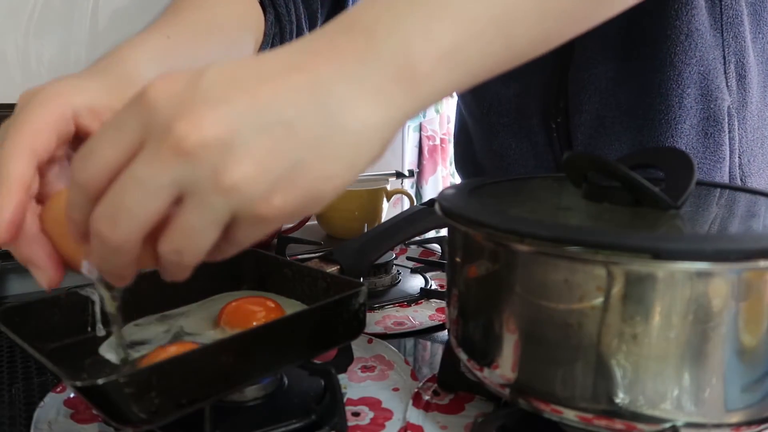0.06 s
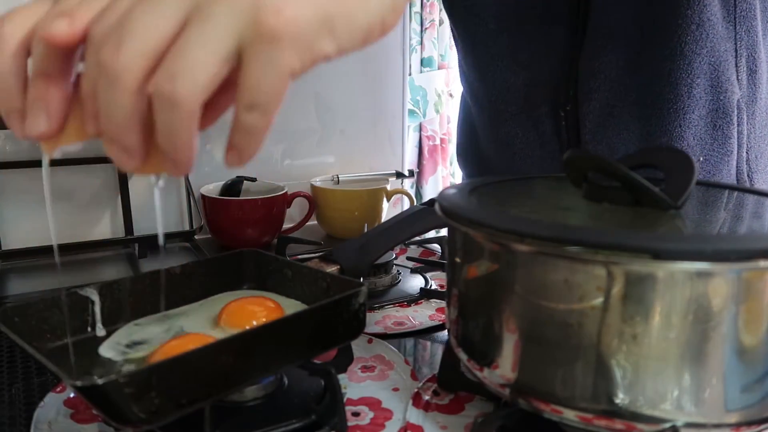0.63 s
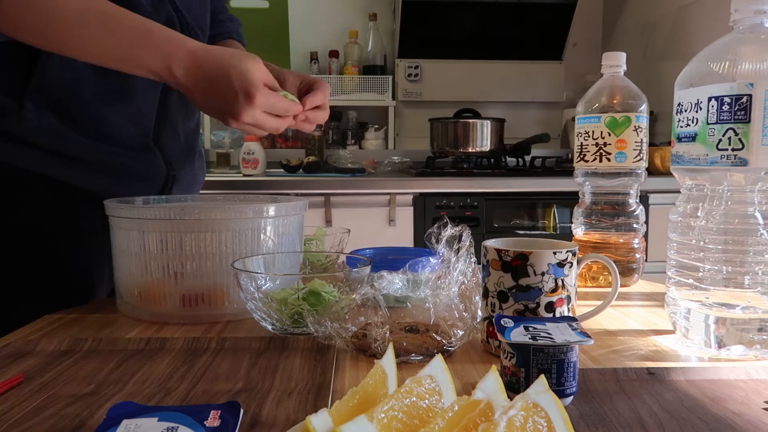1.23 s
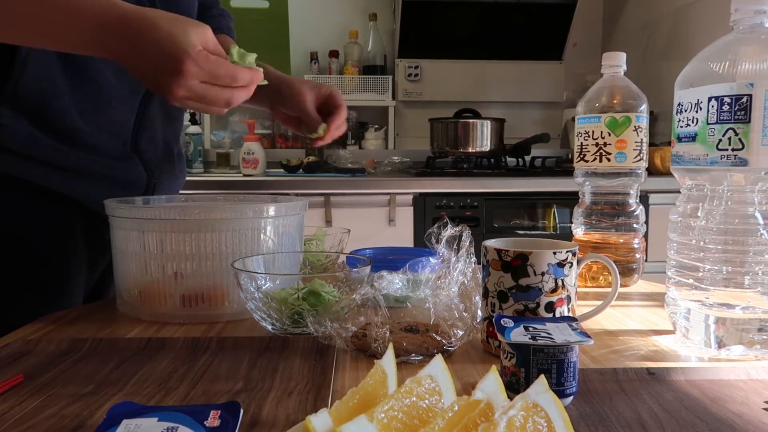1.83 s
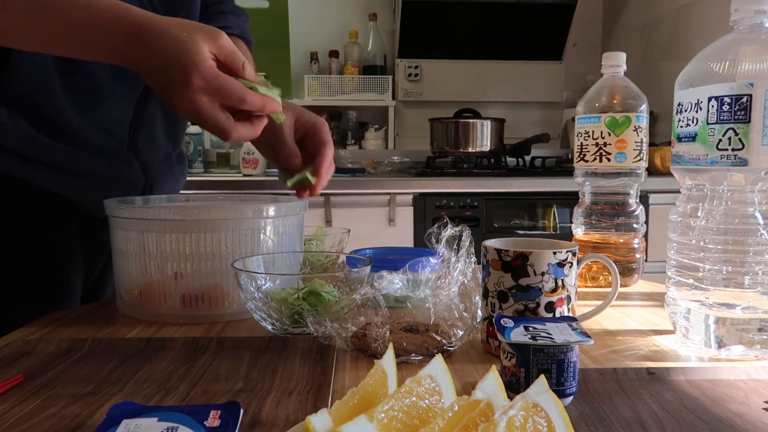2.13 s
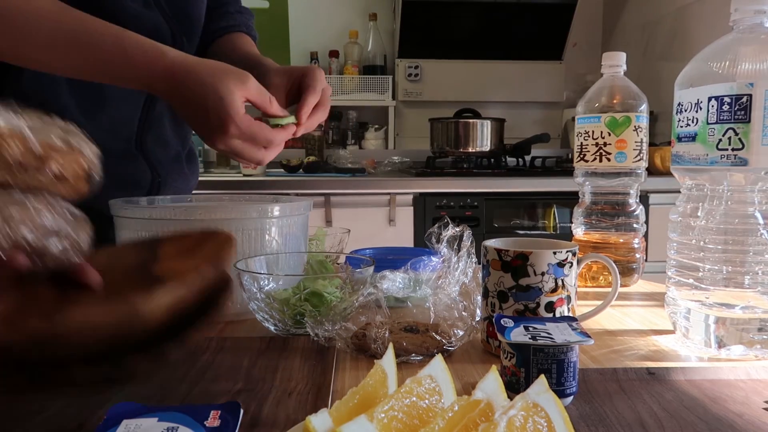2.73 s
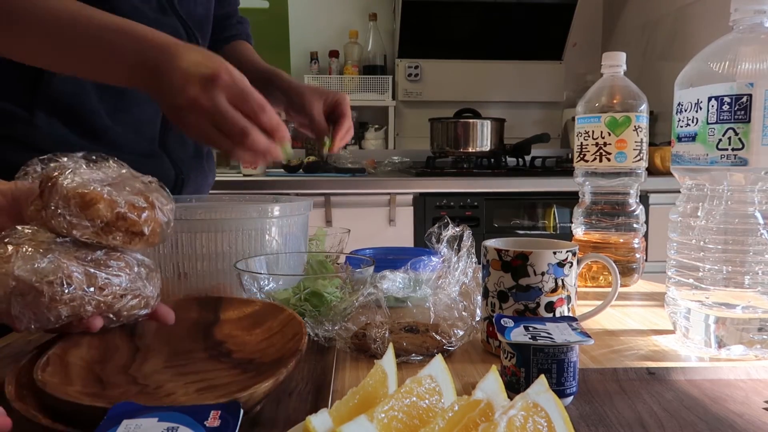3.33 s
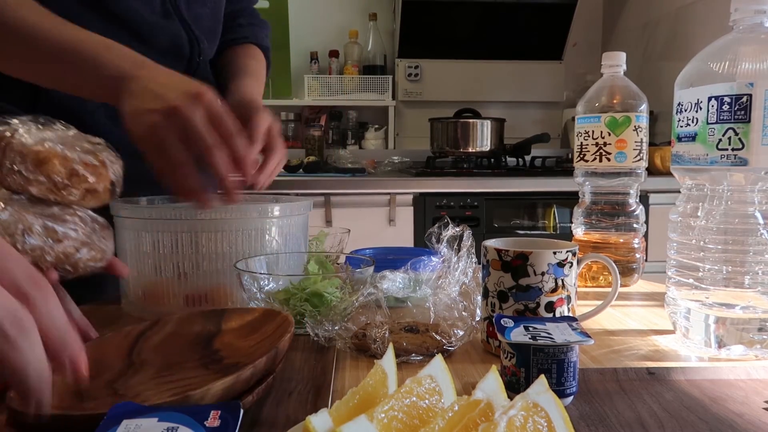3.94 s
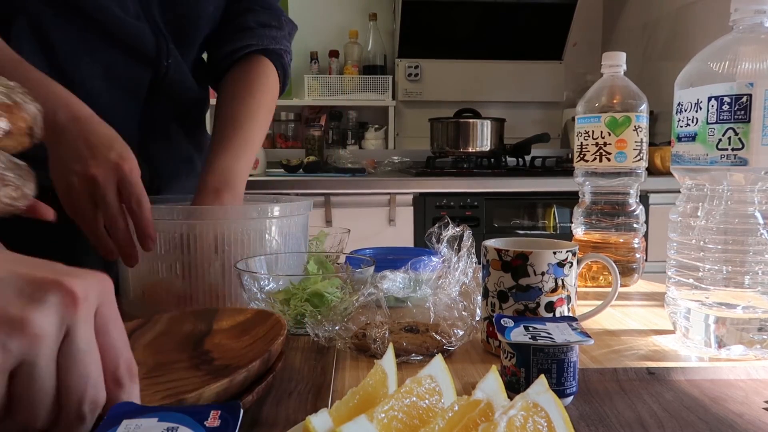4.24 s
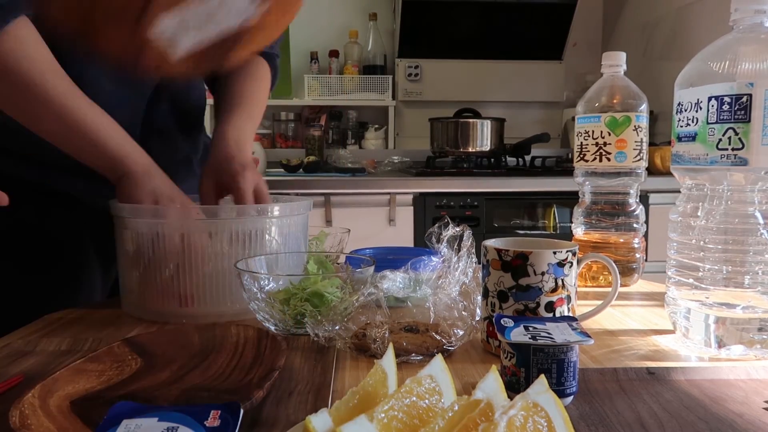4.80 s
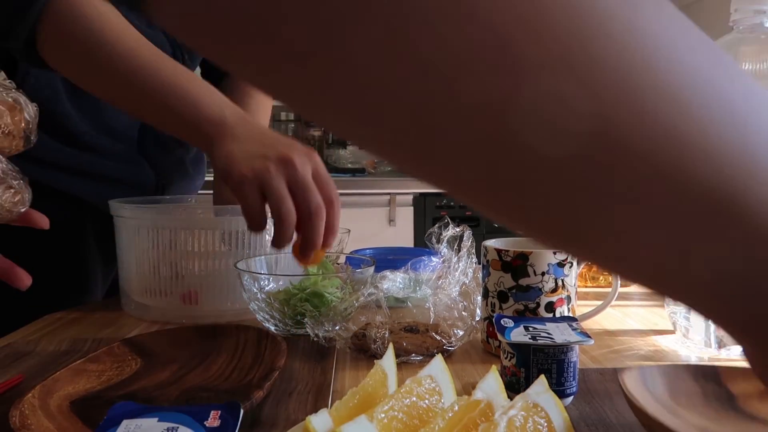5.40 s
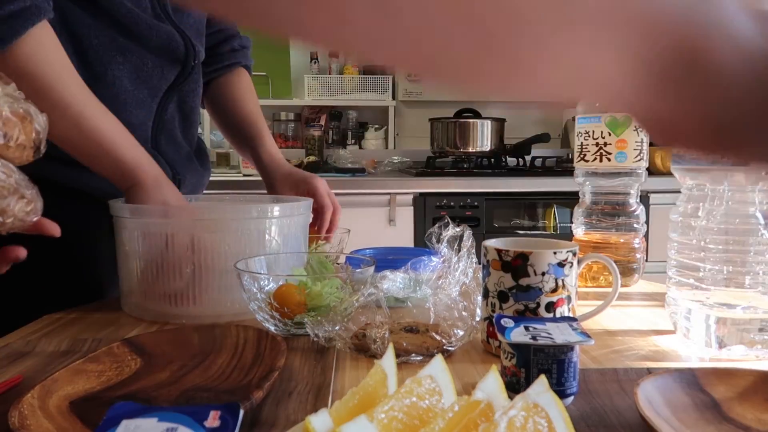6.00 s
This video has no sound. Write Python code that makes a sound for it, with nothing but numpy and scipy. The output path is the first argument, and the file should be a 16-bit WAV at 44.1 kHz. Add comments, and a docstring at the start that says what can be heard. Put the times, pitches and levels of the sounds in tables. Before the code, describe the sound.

A home kitchen extractor hood hums with rushing air and low fan tones. An eggshell cracks at about 0.1 seconds and crunches again around 0.6, with a faint sizzle of egg from 0.2. Just before 0.9 seconds, hum and sizzle cut off, leaving quiet room tone. From then on, hands tear lettuce a little way back, making irregular crisp snaps, light crackling and dull sleeve rustle. After soft table bumps around 2.5 seconds and a brief rub, wooden plates clack together very loudly at 3 seconds, close on the left, slightly overloading the microphone and briefly lowering the background. Lighter taps follow, with wood sliding and scraping from 3.9 to 4.7 seconds as the leaves keep crackling. At 5.6 and 5.9 seconds, a wooden dish lands on the table on the right with two hard knocks and a short room echo.

```python
"""An extractor hood hums in a home kitchen, rushing air under fan tones, while eggshell cracks and egg
sizzles in a pan, until hum and sizzle stop short. Then lettuce is rummaged and torn, its cells bursting,
while wooden plates are stacked and slid and a dish is set down close to the microphone. Impact and
friction excite the modes of the wood and the table, and the room answers with a short echo.
The hardest knocks overload the microphone, and its gain control ducks the room."""
import sys
import numpy as np
from scipy import signal
from scipy.fft import rfft, irfft, next_fast_len
from scipy.io import wavfile
from scipy.ndimage import uniform_filter1d

SR = 44100
rng = np.random.default_rng(int(sys.argv[2]) if len(sys.argv) > 2 else 0)


def pcm_store(signal):
    """Save signal as 16-bit PCM."""
    levels = np.round(np.clip(np.atleast_2d(signal), -1, 1) * 32767)
    wavfile.write(sys.argv[1], SR, levels.astype(np.int16).T)


N = 267246
TIME = np.arange(N) / SR
RING = np.arange(SR // 3) / SR  # time axis of one short event, in seconds
HOOD_STOP_S = .872

# Spectrum of a crisp fracture in leaf or shell. Each row: frequency in Hz, relative level in dB.
FRACTURE_SPECTRUM = [(200, 3.5), (900, -6), (1700, 0.5), (2800, 5), (3600, 0), (5500, -6), (8000, -9.5),
                     (12000, -24), (15500, -40)]
# Modes of the plates and of the table top. Each row: frequency in Hz, level in dB, T60 in seconds.
PLATE_MODES = [(674, -2.5, 0.082), (822, 1.5, 0.089), (912, -4.5, 0.15), (1008, -4, 0.1), (1124, -2, 0.086),
               (1331, 0.5, 0.066), (1390, -3.5, 0.076), (1690, 2, 0.033), (1795, -2.5, 0.046),
               (1900, 1.5, 0.055), (2157, 0.5, 0.026), (2205, 5, 0.049), (2574, 1, 0.045),
               (2800, -3.5, 0.023), (3330, -6, 0.039)]
TABLE_MODES = [(109.5, -4.5, .046), (150, -6.5, .09), (196, 0, 0.14), (266.4, 1.5, 0.17), (318, 13, 0.027),
               (341, 5.5, 0.056), (410, 2.5, 0.072), (486, 0, .024), (547, -1, 0.068), (680, -4.5, 0.047)]


def amp(db):
    """Decibels as an amplitude ratio."""
    return 10 ** (np.asarray(db) / 20)


def read(points, hz):
    """Interpolation of (Hz, value) points on a log-frequency axis."""
    f, value = np.transpose(points)
    return np.interp(np.log(hz + 1), np.log(f + 1), value)


def evened(x):
    """Normalisation to rms 1."""
    return x / np.sqrt(np.mean(x ** 2) + 1e-20)


def unit_blow(x):
    """Normalisation to the energy of 10 ms at rms 1."""
    return x / np.sqrt(np.sum(x ** 2) * 100 / SR + 1e-20)


def add(mix, s, sound):
    """Superposition of a sound on the mix, from s seconds on."""
    part = mix[round(s * SR):][:len(sound)]
    part += sound[:len(part)]


def coloured(x, points, tilt_db=0):
    """Minimum-phase filtering by a spectrum, tilted by tilt_db per octave above 1 kHz."""
    size = 2 * next_fast_len(x.shape[-1] // 2 + 1024)
    hz = np.fft.rfftfreq(size, 1 / SR)
    gain = amp(read(points, hz) + tilt_db * np.log2(np.maximum(hz, 1000) / 1000))
    cepstrum = irfft(np.log(gain))
    cepstrum[1:size // 2] *= 2  # folding the cepstrum makes the filter causal
    cepstrum[size // 2 + 1:] = 0
    return irfft(rfft(x, size) * np.exp(rfft(cepstrum)), size)[..., :x.shape[-1]]


def grains(count, per_s, spread_db):
    """Shot noise: random impulses of very uneven size."""
    size = amp(spread_db * np.minimum(rng.exponential(1, count), 4))
    return size * rng.choice([-1, 1], count) * (rng.random(count) < per_s / SR)


def wander(samples):
    """Slow fluctuation of rms 1: a moving average of white noise."""
    return evened(uniform_filter1d(rng.standard_normal(N), samples))


def burst(length_s):
    """A broadband transient: decaying noise with its spectrum flattened."""
    spectrum = rfft(rng.standard_normal(len(RING)) * np.exp(-RING / length_s))
    return irfft(spectrum / (abs(spectrum) + 1e-12), len(RING)) * np.exp(-RING / (10 * length_s))


def progress(s, length_s):
    """A linear ramp from 0 to 1 over a movement."""
    return np.clip((TIME - s) / length_s, 0, 1)


def ring(modes, scatter_db, favoured_hz=None, favour_db=7.5, favour_octaves=.18):
    """Free vibration in damped modes; the point of contact favours those near one frequency."""
    hz, db, t60 = np.transpose(modes)[:, :, None]
    if favoured_hz:
        db = db + favour_db * np.exp(-(np.log2(hz / favoured_hz) / favour_octaves) ** 2)
    polarity = (-1) ** np.arange(len(hz))[:, None]
    share = polarity * amp(db + scatter_db * rng.standard_normal(hz.shape))
    decay = np.exp(-np.log(1000) * RING / t60)
    return unit_blow((share * decay * np.sin(2 * np.pi * hz * RING)).sum(0))


def diffuse(pair):
    """A diffuse field: coherent at the two ports in the bass, wide in the treble."""
    # Each row: frequency in Hz, gain of side relative to mid in dB.
    side_gain = [(30, -35.5), (100, -29.5), (400, -9), (1200, -9.5), (2500, -12), (4500, -3), (8000, 1.5),
                 (15000, 13.5)]
    side = coloured(pair[1], side_gain)
    return np.array([pair[0] + side, pair[0] - side])


def placed(x, bearing, wet_db):
    """Direct sound leads in phase at the nearer port (positive bearing: left); reverberation follows."""
    # Each row: frequency in Hz, phase between the ports in radians at bearing 1.
    port_phase = [(100, 0.0984), (3000, 0.23), (5500, 2.16), (9000, 2.45), (15000, 4)]
    # Each row: frequency in Hz, reverberation time in seconds.
    kitchen_t60 = [(100, 0.43), (400, 0.26), (2000, 0.25), (6000, 0.21), (14000, 0.16)]
    size = next_fast_len(N + SR // 2)
    turn = np.exp(.5j * bearing * read(port_phase, np.fft.rfftfreq(size, 1 / SR)))
    reflections = grains(2 * len(RING), per_s=5000, spread_db=-2.5).reshape(2, -1)
    hz, t, bands = signal.stft(reflections, SR, nperseg=256)
    decay = np.exp(-np.log(1000) * t / read(kitchen_t60, hz)[:, None])
    tail = signal.istft(bands * decay, SR, nperseg=256)[1][:, :len(RING)]
    tail *= np.clip(RING / 0.00054 - 1, 0, 1)  # silent until the nearest surfaces answer
    echo = amp(wet_db) * diffuse(tail / np.linalg.norm(tail[0]))
    return irfft(rfft(x, size) * (np.array([turn, 1 / turn]) + rfft(echo, size)), size)[:, :N]


def hood(air_db=-33.5, waver_radians=0.53, width_db=-6):
    """Broadband flow noise and fan tones of wavering phase, stopping at once."""
    # Each row: frequency in Hz, relative level in dB.
    air_spectrum = [(18, -43), (30, -11), (81, -10.5), (158, -3), (304, -10), (364, -9.5), (460, -13),
                    (497, -10.5), (552, -16), (905, -16), (1090, -23), (2630, -28), (2840, -29),
                    (5440, -47), (9000, -52.5), (11000, -69), (15000, -78)]
    # Each row: frequency in Hz, rms level in dB.
    fan_tones = [(166.9, -37.5), (199.2, -63), (371.4, -44.5), (500.6, -42.5)]
    air = amp(air_db) * evened(coloured(rng.standard_normal((2, N)), air_spectrum))
    for hz, db in fan_tones:
        drift = evened(uniform_filter1d(wander(5000), 3000))
        air[0] += amp(db) * np.sqrt(2) * np.sin(2 * np.pi * hz * TIME + waver_radians * drift)
    running = np.clip((HOOD_STOP_S - TIME) / 0.00038, 0, 1)
    return diffuse(air * amp([[0], [width_db]])) * running


def fractures(decay_s, per_s, spread_db):
    """A cascade of tiny fractures: impulses that swell, then die away exponentially."""
    return grains(len(RING), per_s, spread_db) * np.sqrt(RING) * np.exp(-RING / decay_s)


def eggshell(ring_t60=0.042, edge_db=-36):
    """Brittle fracture: each crunch excites a resonance of the shell; the first has a bright edge."""
    # Each row: start in seconds, level in dB, decay time in seconds, ring over crunch in dB, ring in Hz.
    breaks = [(0.0746, -28, 0.0073, -8, 1930), (0.102, -37.5, 0.0017, 15, 2010),
              (0.586, -31, 0.004, -13, 2300), (0.597, -28.5, .004, 15, 2990),
              (0.604, -31.5, 0.0052, 5, 2290), (.621, -34, .003, 15, 3160),
              (.671, -32.5, 0.0061, -10, 2930)]
    # Each row: frequency in Hz, relative level in dB.
    crunch_spectrum = [(800, -16), (1600, -7), (2100, -0.5), (3300, 0), (4200, -19), (7000, -30),
                       (14000, -44)]
    out = np.zeros(N)
    for s, db, decay_s, ring_db, hz in breaks:
        clicks = coloured(grains(len(RING), per_s=4000, spread_db=7.5), crunch_spectrum)
        crunch = unit_blow(clicks * np.sqrt(RING) * np.exp(-RING / decay_s))
        shell = ring([(hz, 0, ring_t60)], scatter_db=0)
        add(out, s, amp(db) * unit_blow(crunch + amp(ring_db) * shell))
    edge = unit_blow(coloured(burst(0.0022), FRACTURE_SPECTRUM, tilt_db=6))
    add(out, breaks[0][0], amp(edge_db) * edge)
    return placed(out, bearing=0.97, wet_db=-15)


def sizzle(start_s=0.21, rise_s=0.024, level_db=-51, fade_db_per_s=16):
    """Shot noise of bursting bubbles: egg white meets the warm pan, calms, and ends with the hum."""
    # Each row: frequency in Hz, relative level in dB.
    fizz_spectrum = [(1500, -12), (4000, -9), (7000, -7), (8700, -13), (10500, -24), (14000, -28)]
    fizz = evened(coloured(grains(N, per_s=7300, spread_db=3.5), fizz_spectrum))
    envelope = progress(start_s, rise_s) * amp(level_db - fade_db_per_s * (TIME - start_s))
    return placed(envelope * fizz * (TIME < HOOD_STOP_S), bearing=0.97, wet_db=-12)


def handling(fade_s=0.11):
    """Amplitude envelope of the hands' work, rising as they move and falling as they rest."""
    # Each row: start in seconds, start of the fade-out in seconds, level in dB.
    spells = [(0.817, 1.254, -51), (1.244, 1.635, -50), (1.64, 2.951, -49.5), (3.094, 3.855, -75.5),
              (4.23, 5.523, -51), (5.59, 6.1, -46.5)]
    return sum(amp(db) * progress(start, fade_s) * (1 - progress(end, fade_s))
               for start, end, db in spells)


def brushing(over_rustle_db=2.5, uneven_db=2):
    """Dull, uneven friction noise of sleeves and soft leaves during the handling."""
    # Each row: frequency in Hz, relative level in dB.
    brush_spectrum = [(25, -14), (60, -1), (160, 1.5), (300, 0.5), (500, -7.5), (1200, -14), (2600, -14),
                      (6000, -53), (15000, -55.5)]
    uneven = amp(uneven_db * wander(2500))
    friction = evened(uneven * coloured(rng.standard_normal((2, N)), brush_spectrum))
    return diffuse(amp(over_rustle_db) * handling() * friction)


def snap(decay_s, tilt_db, hz, t60_cycles=13, ring_loss_db_per_s=300):
    """Bursting cells drive a damped leaf resonance; a slow tear rings less than a clean snap."""
    cells = fractures(decay_s, per_s=1500, spread_db=1.5)
    leaf = signal.oaconvolve(cells, ring([(hz, 0, t60_cycles / hz)], scatter_db=0))[:len(RING)]
    crack = unit_blow(coloured(cells, FRACTURE_SPECTRUM, tilt_db))
    return unit_blow(crack + amp(-0.5 - ring_loss_db_per_s * decay_s) * unit_blow(leaf))


def lettuce(clump_db=5):
    """Cell rupture: torn leaves snap, and handled leaves crackle in small clumps."""
    # Each row: start in seconds, level in dB, decay time in seconds, tilt in dB per octave, ring in Hz.
    tears = [(0.923, -42.5, 0.0025, 5.5, 3200), (0.961, -41, 0.004, 0, 2900),
             (1.097, -28, 0.0042, 2.5, 3000), (1.103, -30.5, 0.0059, 7, 4150),
             (1.304, -41, 0.0022, 11.5, 3500), (1.376, -40, 0.028, 3.5, 3950), (1.421, -39, 0.022, 4, 3250),
             (1.517, -36.5, 0.025, 5.5, 4740), (1.592, -38, 0.0049, -1.5, 2150),
             (1.604, -34, 0.0033, 2, 5430), (1.726, -31, 0.0084, 4, 2450), (1.814, -33, 0.0068, -5.5, 2030),
             (2.288, -34.5, 0.0016, 5.5, 3150), (2.436, -26.5, 0.0056, -1, 3600),
             (2.449, -27, 0.01, 2.5, 2530), (2.695, -36, 0.014, 0, 5400), (2.789, -41, 0.0055, 5, 2880),
             (2.82, -41, 0.0016, 7, 3200), (2.881, -41, 0.0015, 3, 3310), (3.155, -27, 0.014, -1.5, 5400),
             (3.226, -44, 0.00093, 22, 7660), (3.353, -42, 0.0023, -5.5, 4130),
             (3.604, -35, 0.0034, 3.5, 7700), (3.767, -42, .003, 3.5, 2460), (4.308, -42, .003, -8, 2720),
             (4.426, -45, 0.0013, 4, 3480), (4.486, -42, 0.006, -6, 2110), (4.568, -38, 0.014, 1, 2680),
             (4.67, -46, 0.0029, 4, 3000), (4.752, -39.5, 0.0033, 3.5, 2980),
             (4.794, -38.5, 0.0034, 0, 2530), (4.853, -43, 0.00087, 5.5, 2900),
             (5.008, -45, 0.0055, 6, 3700), (5.074, -41, 0.0049, -3, 2240),
             (5.096, -37.5, 0.0056, 1.5, 2650), (5.171, -34, 0.003, 21, 2970),
             (5.303, -45, 0.0027, -1, 3330), (5.412, -42.5, 0.0045, 8, 3060), (5.719, -37, 0.0061, 2, 3000),
             (5.84, -46, .002, 6, 6030)]
    snaps = np.zeros(N)
    for s, db, decay_s, tilt_db, hz in tears:
        add(snaps, s, amp(db) * snap(decay_s, tilt_db, hz))
    cells = amp(clump_db * wander(600)) * grains(N, per_s=1800, spread_db=3)
    rustle = handling() * evened(coloured(cells, FRACTURE_SPECTRUM, tilt_db=0.75))
    return placed(snaps, bearing=-0.42, wet_db=-6) + placed(rustle, bearing=-0.56, wet_db=-7)


def contacts(rows, graze_lead_s=0.0062, graze_db=-26):
    """Multiple impact: wood grazes, lands, then tips onto its other edge, duller and with more thump."""
    for s, db, cutoff_hz, thump_db, settle_s, settle_db, favoured_hz in rows:
        yield s - graze_lead_s, db + graze_db, cutoff_hz / 2, thump_db, None
        yield s, db, cutoff_hz, thump_db, favoured_hz
        yield s + settle_s, db + settle_db, cutoff_hz * 0.51, thump_db + 1.5, favoured_hz


def push(hz, length_s):
    """A dull pulse of band-limited noise, peaking at half of length_s."""
    swell = RING / length_s * np.exp(2 - 2 * RING / length_s) * signal.windows.tukey(len(RING), .02)
    band = signal.butter(2, [hz / 2, 1.5 * hz], "band", fs=SR, output="sos")
    return evened(signal.sosfilt(band, rng.standard_normal(len(RING)))) * swell


def knocks(rows, modes, crack_spectrum, crack_db, crack_s, push_db, push_hz, push_s):
    """Impact excites a crack and the wood's modes, low-passed by a soft contact; the table thumps."""
    out = np.zeros(N)
    for s, db, cutoff_hz, thump_db, favoured_hz in contacts(rows):
        contact_s = crack_s * amp(-0.12 * db)  # a light touch chatters for longer than a firm blow
        crack = unit_blow(coloured(burst(contact_s), crack_spectrum))
        wood = ring(modes, scatter_db=4.5, favoured_hz=favoured_hz) + amp(crack_db) * crack
        wood = unit_blow(signal.lfilter(*signal.butter(4, cutoff_hz, fs=SR), wood))
        add(out, s, amp(db) * (wood + amp(thump_db) * ring(TABLE_MODES, scatter_db=3)))
    # small boards radiate no deep bass
    out = signal.sosfilt(signal.butter(2, 80, "high", fs=SR, output="sos"), out)
    for s, db, *_ in rows:
        add(out, s, amp(db + push_db) * push(push_hz, push_s))
    return out


def plate_knocks():
    """Impacts of plate on plate set the wood ringing in its modes."""
    # Each row: time in seconds, level in dB, contact cutoff in Hz, relative thump in dB,
    # settling delay in seconds, relative settling level in dB, favoured frequency in Hz.
    blows = [(1.951, -32, 3760, -21, 0.01, -4.5, 2080), (2.699, -34, 2220, -32, .014, -14, 1110),
             (2.9637, 2.5, 9800, -17.5, .0055, -4.5, 1710), (2.9805, -4.5, 5550, -10.5, .025, -12.5, 845),
             (3.206, -26.5, 3100, -10, .013, -4, 1270), (3.259, -31.5, 3300, -8, .013, 2, 744),
             (3.395, -26, 3260, -6.5, .014, 1.5, 1860), (3.915, -24, 3700, -0.5, .0082, 3, 930),
             (3.934, -27, 3560, -0.5, .011, -1, 1340), (3.961, -33, 3820, 3, .008, -1, 1010),
             (4.027, -44.5, 1700, 5.5, .01, 1, 1340), (4.064, -35, 1920, -1, .008, -10, 1340),
             (4.255, -40.5, 3060, 3.5, .011, -7, 560), (4.3925, -34, 3000, -7, .006, -16, 1090),
             (4.413, -35, 1880, -3.5, .012, -1.5, 1410), (4.602, -31.5, 2180, -13, .022, -1, 666),
             (4.977, -43.5, 3900, 3.5, .015, -31, 1150), (5.098, -39.5, 4200, 6.5, .006, -25, 1090),
             (5.468, -41, 1980, 5.5, .015, -25, 1100)]
    # Each row: frequency in Hz, relative level in dB.
    crack_spectrum = [(100, -14), (400, -5), (750, -1), (1200, 2), (2200, -1.5), (3500, -4), (4400, -11),
                      (6000, -8.5), (8500, -20), (11000, -18.5), (15000, -45)]
    return knocks(blows, PLATE_MODES, crack_spectrum, crack_db=1, crack_s=0.0043,
                  push_db=-33.5, push_hz=88, push_s=0.0045)


def bumps():
    """Structure-borne sound: soft bumps carried through the table."""
    # Each row: start in seconds, level in dB, frequency in Hz, length in seconds.
    nudges = [(2.496, -41.5, 183, 0.062), (2.556, -34, 103, .026), (2.716, -48.5, 98, 0.078),
              (2.967, -6.5, 63, 0.003), (4.518, -39, 225, 0.028), (4.767, -39, 35.2, 0.079)]
    out = np.zeros(N)
    for s, db, hz, length_s in nudges:
        add(out, s, amp(db) * push(hz, length_s))
    return out


def stroke(s, length_s, fullness=1):
    """Amplitude follows a hand that speeds up and slows down: a parabola raised to a power."""
    u = progress(s, length_s)
    return (4 * u * (1 - u)) ** fullness


def rub(start_s=2.7, length_s=0.14, from_hz=1300, to_hz=756, flutter_hz=130, level_db=-47, catch_db=6):
    """Stick-slip friction heard through one sinking resonance."""
    hz = from_hz + (to_hz - from_hz) * progress(start_s, length_s) ** 0.92
    phase = 2 * np.pi * np.cumsum(hz) / SR
    lowpass = signal.butter(2, flutter_hz, fs=SR, output="sos")
    flutter = signal.sosfilt(lowpass, rng.standard_normal((2, N)))
    resonance = flutter[0] * np.cos(phase) + flutter[1] * np.sin(phase)
    catches = amp(catch_db * wander(900))
    return amp(level_db) * stroke(start_s, length_s, fullness=0.23) * evened(catches * resonance)


def slide(ring_db=-2, catch_db=2, rim_width_hz=45):
    """Stick-slip on wood grain drives plate and table; each push rings the rim at its own pitch."""
    # Each row: start and length in seconds, level in dB, relative table rumble in dB,
    # rim frequency in Hz, relative rim level in dB.
    pushes = [(3.916, 0.3, -45, 3, 1344, -4), (4.312, 0.047, -46.5, 9.5, 686, -3),
              (4.334, 0.064, -40, -5, 3385, -6), (4.387, 0.071, -42, 1.5, 400, 0),
              (4.44, 0.077, -49, 7, 1410, 2), (4.595, 0.077, -31, -10, 1150, -7),
              (4.616, 0.045, -44.5, -10, 1935, -2)]
    # Each row: frequency in Hz, relative level in dB.
    scrape_spectrum = [(100, -28), (400, -26), (620, 4), (800, -3), (1150, 6), (1550, -4.5), (1860, 2),
                       (2200, -9.5), (3400, -6), (5000, -16), (12000, -36)]
    slips = amp(catch_db * wander(300)) * grains(N, per_s=2800, spread_db=2.3)
    plate = evened(signal.oaconvolve(slips, ring(PLATE_MODES, scatter_db=0.5))[:N])
    table = evened(signal.oaconvolve(slips, ring(TABLE_MODES, scatter_db=0.5))[:N])
    scrape = evened(evened(coloured(slips, scrape_spectrum)) + amp(ring_db) * plate)
    out = np.zeros(N)
    for s, length_s, db, rumble_db, rim_hz, rim_db in pushes:
        rim = evened(signal.lfilter(*signal.iirpeak(rim_hz, rim_hz / rim_width_hz, fs=SR), slips))
        out += amp(db) * stroke(s, length_s) * (scrape + amp(rumble_db) * table + amp(rim_db) * rim)
    return out


def dish_knocks():
    """Impacts of a wooden dish on the table excite the modes of both."""
    # Each row: time in seconds, level in dB, contact cutoff in Hz, relative thump in dB,
    # settling delay in seconds, relative settling level in dB, favoured frequency in Hz.
    blows = [(5.6121, -2, 6500, -4, 0.04, -14, 1205), (5.833, -43.5, 905, 16, 0.0083, -17, 400),
             (5.8992, -12.5, 8200, -11, 0.0043, -1, 2700), (5.9079, -2.5, 7800, -5.5, .013, -12.5, 920),
             (6.055, -33.5, 4300, -21, 0.011, -7, 2600)]
    # Each row: frequency in Hz, level in dB, T60 in seconds.
    modes = [(386, 4, 0.066), (568, 6, 0.017), (605, 5, 0.061), (830, -1, 0.019), (970, 1.5, 0.026),
             (1113, 6.5, 0.044), (1270, 9, 0.033), (1970, 13, 0.038), (2240, -6, 0.021),
             (2780, 10.5, 0.014), (3250, 7.5, 0.028), (3770, 8, 0.021)]
    # Each row: frequency in Hz, relative level in dB.
    crack_spectrum = [(100, -18.5), (350, 0.5), (650, -0.5), (1100, -3.5), (1550, -5), (2500, 0.5),
                      (3300, -9), (4500, -11), (6800, -11.5), (8500, -9.5), (11000, -12), (15000, -35)]
    return knocks(blows, modes, crack_spectrum, crack_db=4, crack_s=0.0019,
                  push_db=-28, push_hz=219, push_s=0.021)


def room_tone(level_db=-47.5, width_db=-2):
    """Diffuse background noise of the kitchen once the hood is silent."""
    # Each row: frequency in Hz, relative level in dB.
    room_spectrum = [(20, -9.5), (50, 4.5), (90, -1.5), (150, 3), (280, -1), (440, -10.5), (1100, -12.5),
                     (2600, -11.5), (4400, -17.5), (10000, -26.5), (12800, -37), (15000, -52)]
    air = amp(level_db) * evened(coloured(rng.standard_normal((2, N)), room_spectrum))
    return diffuse(air * amp([[0], [width_db]])) * (TIME > HOOD_STOP_S)


def scene():
    """Superposition of the sources: plates on the left, the dish on the right, leaves further back."""
    plates, dish = plate_knocks(), dish_knocks()
    plates = placed(plates + slide() + rub(), bearing=0.73, wet_db=-13.5)
    dish = placed(dish, bearing=-0.81, wet_db=-8.5)
    return hood() + room_tone() + eggshell() + sizzle() + plates + dish + bumps() + brushing() + lettuce()


def record(dry, threshold_db=-16, most_db=11, recover_db_per_s=8, attack_s=0.0064,
           dip_hz=8100, dip_q=4, dip_db=-5, edge_hz=15800):
    """Automatic gain control lags loud knocks, so their peaks clip; a treble dip and band limit follow."""
    power = signal.lfilter([1 / 128], [1, 1 / 128 - 1], (dry ** 2).mean(0))
    excess_db = np.clip(10 * np.log10(power + 1e-12) - threshold_db, 0, most_db)
    recovery_db = TIME * recover_db_per_s
    held_db = np.maximum.accumulate(excess_db + recovery_db) - recovery_db
    lag = np.exp(-1 / (attack_s * SR))
    ducked = dry / amp(signal.lfilter([1 - lag], [1, -lag], held_db))
    clipped = ducked / (1 + ducked ** 6) ** (1 / 6)
    dipped = clipped - (1 - amp(dip_db)) * signal.lfilter(*signal.iirpeak(dip_hz, dip_q, fs=SR), clipped)
    band_limit = signal.firwin(511, edge_hz, window=("kaiser", 9), fs=SR)
    return signal.oaconvolve(dipped, band_limit[None], "same")


dry = scene()
out = record(dry)
pcm_store(out)
```